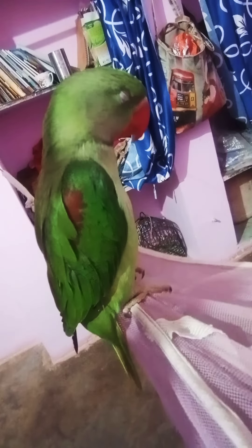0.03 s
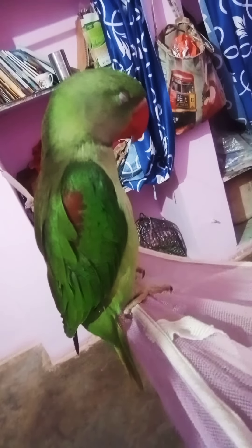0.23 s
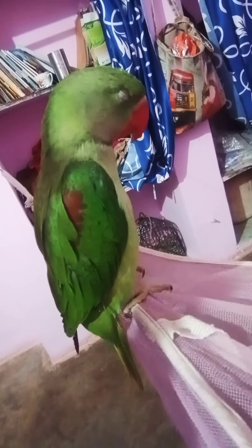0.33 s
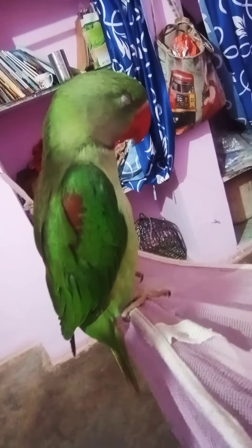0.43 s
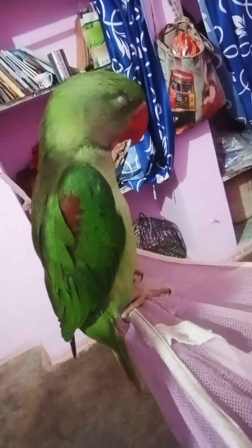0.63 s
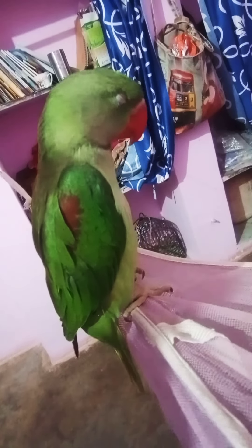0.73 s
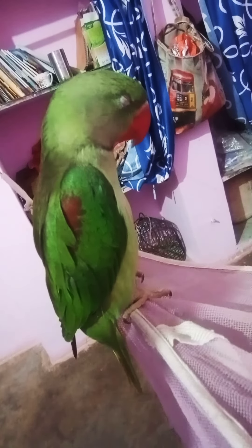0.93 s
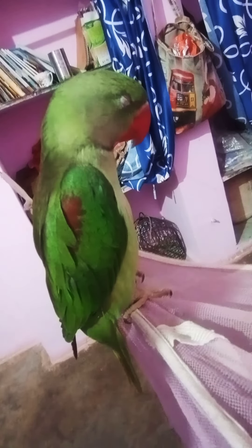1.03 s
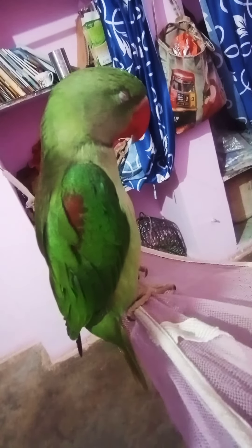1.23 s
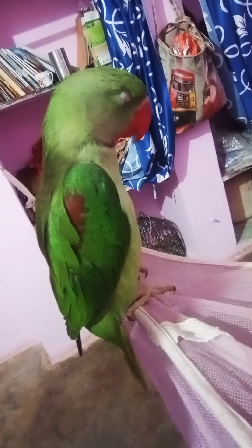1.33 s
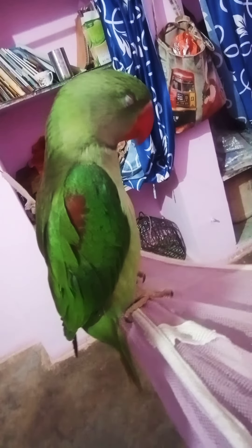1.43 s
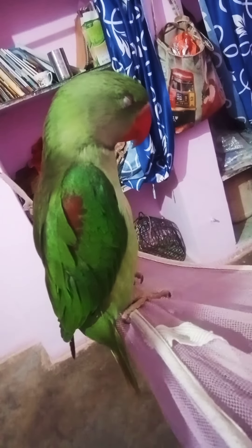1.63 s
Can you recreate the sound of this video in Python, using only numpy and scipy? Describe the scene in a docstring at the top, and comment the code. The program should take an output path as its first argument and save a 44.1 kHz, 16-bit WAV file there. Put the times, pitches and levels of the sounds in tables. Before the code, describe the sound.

Steady rush of a ceiling fan with soft pulsing blades and low puffs of air.

```python
"""A small room with a ceiling fan: a steady rush of air, a faint motor hum and a soft swish
of the blades about five times a second. The sound of the fan sinks slowly.
Its draught buffets the microphone in low, uneven puffs, one much stronger than the rest."""
import sys
import numpy as np
from scipy import signal
from scipy.fft import rfft, irfft
from scipy.io import wavfile
from scipy.ndimage import uniform_filter1d

SR = 44100
rng = np.random.default_rng(int(sys.argv[2]) if len(sys.argv) > 2 else 0)


def log_audio(samples):
    """Write samples as a 16-bit WAV file to the path given in sys.argv[1]."""
    # one column per channel
    frames = np.atleast_2d(samples).T
    # limit to full scale, then quantise
    limited = np.clip(frames, -1, 1)
    pcm = np.round(limited * 32767).astype(np.int16)
    wavfile.write(sys.argv[1], SR, pcm)


N = 74970


def undb(db):
    """Decibels to gain."""
    return 10 ** (np.asarray(db) / 20)


def unit(x):
    """Scale to rms 1."""
    return x / np.sqrt(np.mean(x ** 2))


def noise(points):
    """Noise of rms 1, shaped by (freq_hz, relative_db) points."""
    freq_hz, relative_db = np.array(points, float).T
    bins_hz = np.maximum(np.fft.rfftfreq(N, 1 / SR), 1)
    gain = undb(np.interp(np.log(bins_hz), np.log(freq_hz), relative_db))
    return unit(irfft(rfft(rng.standard_normal(N)) * gain, N))


def walk(rate_hz):
    """Smooth random curve, rms about 1, bandwidth rate_hz."""
    bins_hz = np.fft.rfftfreq(2 * N, 1 / SR)
    lowpass = np.exp(-(bins_hz / rate_hz) ** 2)
    return unit(irfft(rfft(rng.standard_normal(2 * N)) * lowpass))[:N]


def room(x, t, wet_db=-9, t60_s=0.26):
    """Close walls colour the sound and add a short tail."""
    tail = rng.standard_normal(N) * np.exp(-np.log(1000) * t / t60_s)
    wet = signal.fftconvolve(x, tail / np.linalg.norm(tail))[:N]
    return (x + undb(wet_db) * wet) / np.hypot(1, undb(wet_db))


def fan_motor(t, start_gain_db=0.8, fade_db_per_s=4.5, waver_db=4, pitch_drift=0.00516):
    """Faint tones of motor and housing, wavering in pitch and level."""
    # hum tones: pitch_hz, level_db
    tones = [(297, -64), (512, -65), (604, -63), (637, -73.5), (700, -67), (814, -65), (938, -75),
             (1116, -72.5), (1280, -72.5), (1399, -86.5), (3444, -78)]
    hum = np.zeros(N)
    for pitch_hz, level_db in tones:
        drifting_hz = pitch_hz * (1 + pitch_drift * walk(rate_hz=10.26))
        cycles = np.cumsum(drifting_hz) / SR + rng.random()
        rms = undb(level_db + waver_db * walk(rate_hz=16.5))
        hum += np.sqrt(2) * rms * np.sin(2 * np.pi * cycles)
    return hum * undb(start_gain_db - fade_db_per_s * t)


def fan_air(t, start_db=-48, fade_db_per_s=4.5, flicker_db=0.75):
    """Rush of stirred air; the level flickers slightly and sinks."""
    # air spectrum: freq_hz, relative_db
    spectrum = [(30, -14), (100, -0.5), (300, 3.5), (430, 0), (560, -4), (650, 2), (800, -4), (1100, -3.5),
                (1650, -6.5), (2200, -5), (2750, -10.5), (3400, -10.5), (4300, -16), (5400, -18.5),
                (6700, -15.5), (7600, -24.5), (8600, -39.5), (10000, -51), (15000, -47.5)]
    return noise(spectrum) * undb(start_db - fade_db_per_s * t + flicker_db * walk(rate_hz=8.5))


def fan_swish(t, rise_sigma_s=0.024, fall_sigma_s=0.033):
    """The turning blades swish; a very faint, separate high hiss swells with each swish."""
    # blade swish spectrum, plus the separate hiss near 15 kHz (last point): freq_hz, relative_db
    swish_and_hiss = [(200, -12.5), (700, 11), (1400, -10), (2200, 7), (2800, -4.5), (3450, 5.5),
                      (3900, -2), (4400, 3), (5500, -3), (6700, 0), (7600, -16.5), (8600, -24.5),
                      (10500, -34.5), (13800, -47), (15200, -22)]
    # blade swishes, about 0.19 s apart: crest_s, level_db
    swishes = [(0.09, -51), (0.28, -52), (0.471, -52), (.662, -54), (0.849, -53.5), (1.04, -55.5),
               (1.229, -54), (1.424, -56.5), (1.608, -60)]
    swell = np.zeros(N)
    for crest_s, level_db in swishes:
        sigma_s = np.where(t < crest_s, rise_sigma_s, fall_sigma_s)
        swell += undb(level_db) * np.exp(-0.5 * ((t - crest_s) / sigma_s) ** 2)
    return noise(swish_and_hiss) * swell


def eddies(low_hz, top_hz, evenness=0.68):
    """Low tumbling air pressure of fairly even strength, rms 1."""
    band = [(low_hz / 2, -24), (low_hz, 0), (top_hz, 0),
            (top_hz * 2, -20), (top_hz * 5, -52), (5000, -110)]
    flow = signal.hilbert(noise(band))
    strength = np.sqrt(uniform_filter1d(np.abs(flow) ** 2, size=500))
    return unit(flow.real / strength ** evenness)


def draught(t):
    """Puffs of eddying air swell and pass on the microphone."""
    # puffs: crest_s, sigma_s, level_db, low_hz, top_hz
    puffs = [(0.152, 0.046, -47, 70, 127), (0.211, 0.015, -36, 68, 102), (0.258, 0.0085, -30, 75, 122),
             (0.288, 0.016, -26, 142, 193), (0.309, 0.015, -31, 85, 119), (0.36, 0.052, -48.5, 70.6, 111),
             (0.457, 0.048, -48, 70, 126), (0.561, 0.018, -46, 110, 184), (.61, 0.016, -45, 64.5, 125),
             (0.727, 0.019, -46, 63.4, 131), (0.79, .014, -42.5, 75, 103), (1.003, 0.038, -49, 55, 125),
             (1.076, 0.011, -44, 75, 124), (1.124, 0.021, -45.5, 69, 118), (1.165, 0.013, -50, 140, 268),
             (1.27, .035, -58, 75, 160), (1.38, 0.021, -58, 65, 108), (1.512, .018, -42.5, 74, 171),
             (1.58, 0.011, -53, 60, 130), (1.648, 0.023, -50.5, 74, 127)]
    pressure = np.zeros(N)
    for crest_s, sigma_s, level_db, low_hz, top_hz in puffs:
        swell = undb(level_db) * np.exp(-0.5 * ((t - crest_s) / sigma_s) ** 2)
        pressure += swell * eddies(low_hz, top_hz)
    return pressure


def scene():
    """Air and swish through the room; hum and draught direct. Mono."""
    t = np.arange(N) / SR
    airflow = room(fan_air(t) + fan_swish(t), t)
    return (airflow + fan_motor(t) + draught(t))[None]


def record(dry, low_cut_hz=33, high_cut_hz=15500):
    """The recorder cuts the deepest bass and the top treble."""
    highpass = signal.butter(2, low_cut_hz, "high", fs=SR, output="sos")
    lowpass = signal.ellip(8, 0.2, 70, high_cut_hz, fs=SR, output="sos")
    return signal.sosfilt(lowpass, signal.sosfilt(highpass, dry))


dry = scene()
out = record(dry)
log_audio(out)
```